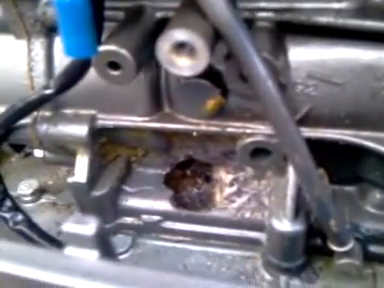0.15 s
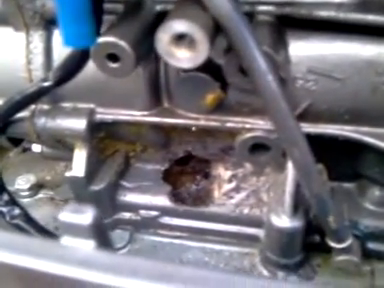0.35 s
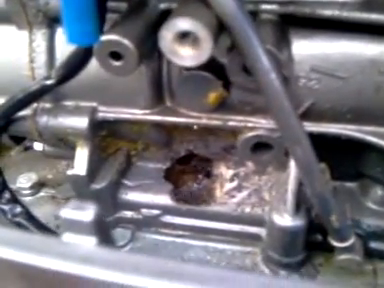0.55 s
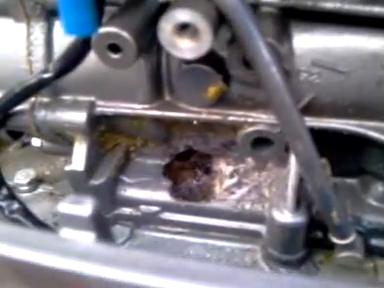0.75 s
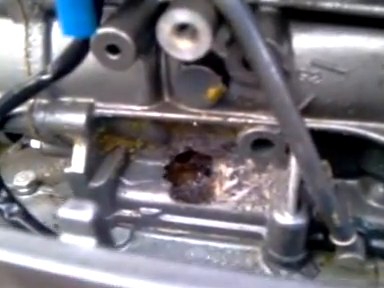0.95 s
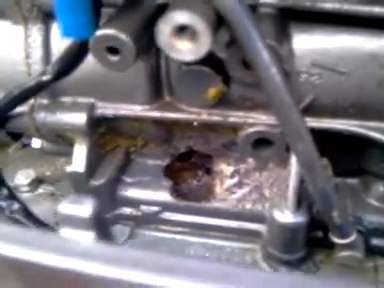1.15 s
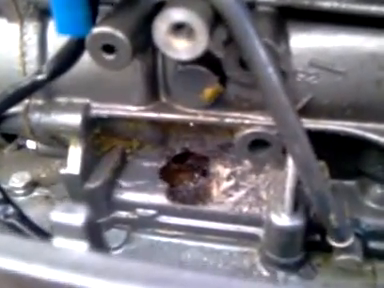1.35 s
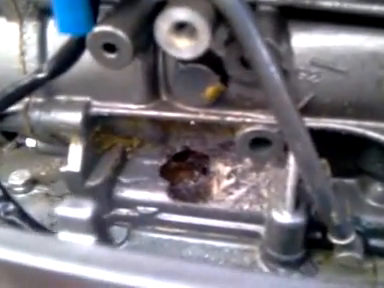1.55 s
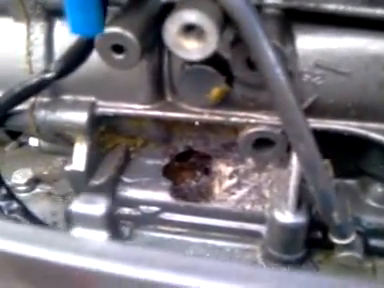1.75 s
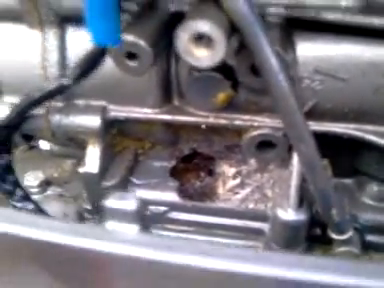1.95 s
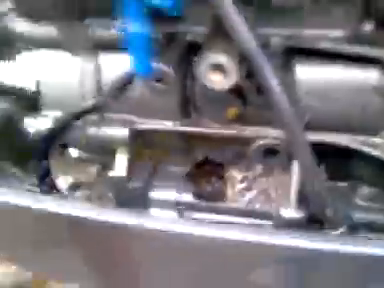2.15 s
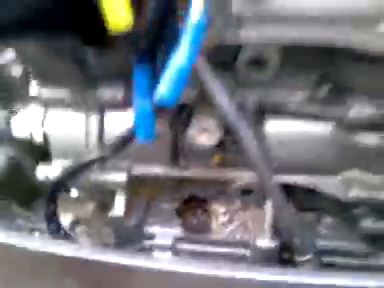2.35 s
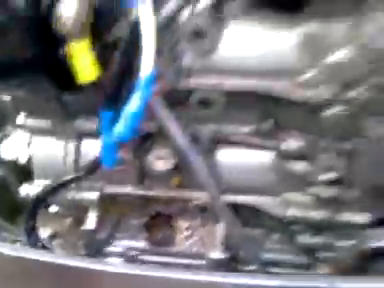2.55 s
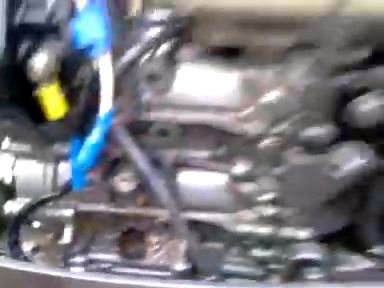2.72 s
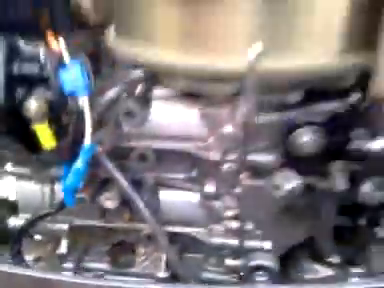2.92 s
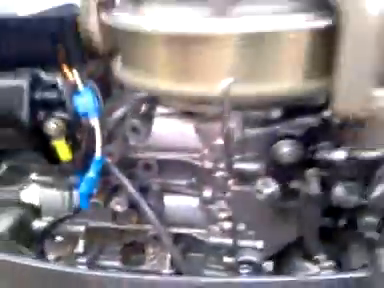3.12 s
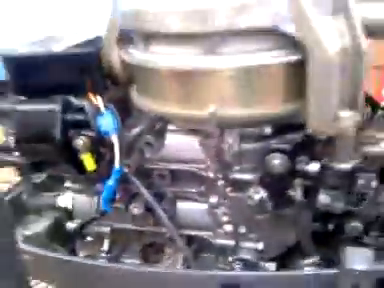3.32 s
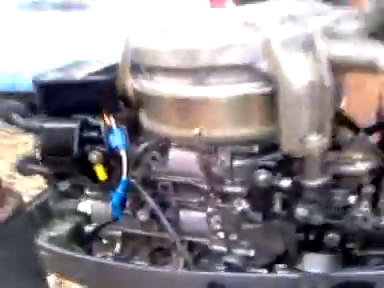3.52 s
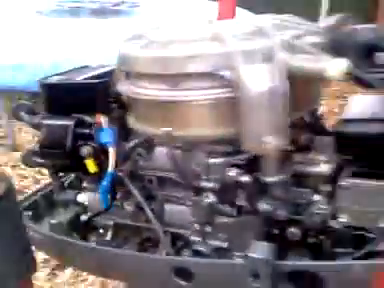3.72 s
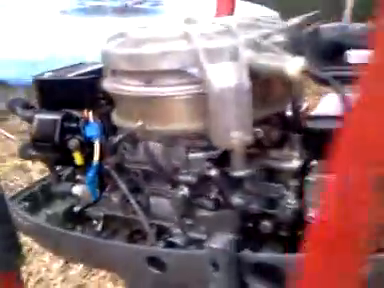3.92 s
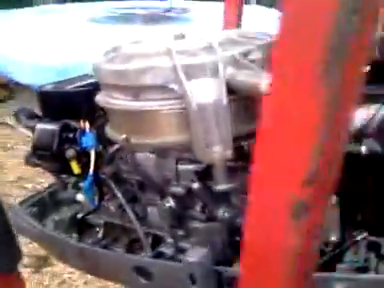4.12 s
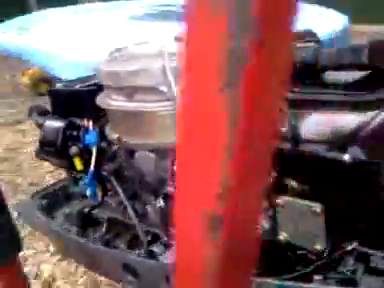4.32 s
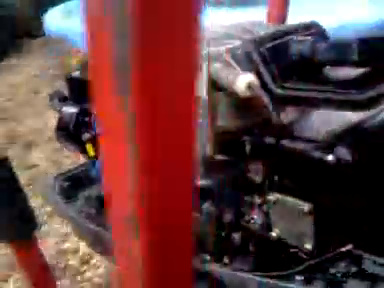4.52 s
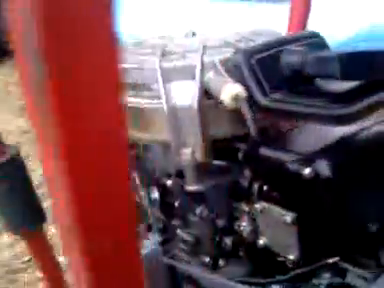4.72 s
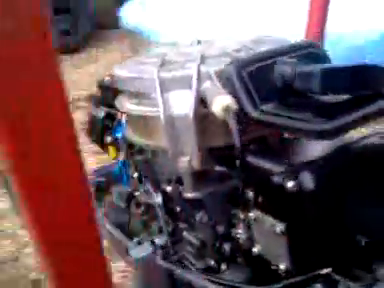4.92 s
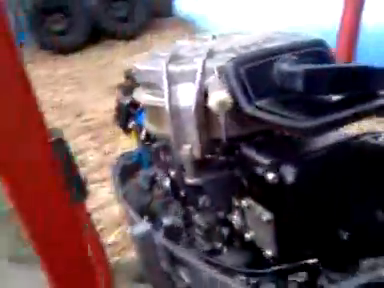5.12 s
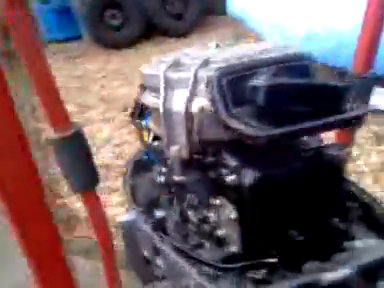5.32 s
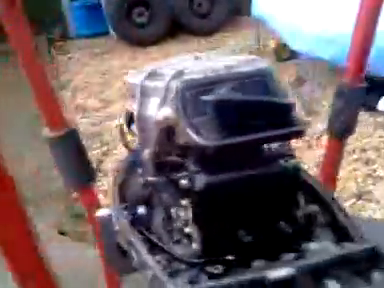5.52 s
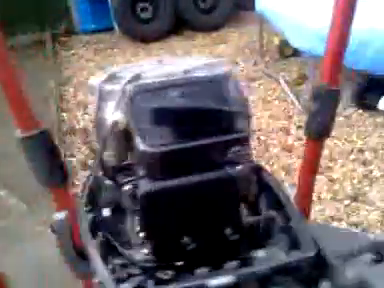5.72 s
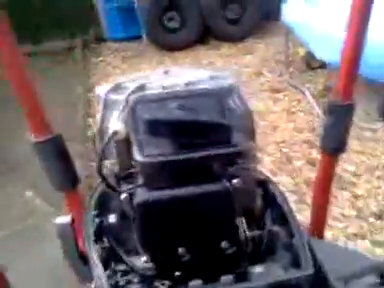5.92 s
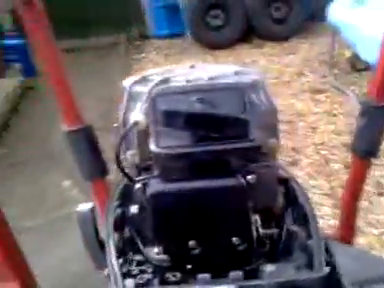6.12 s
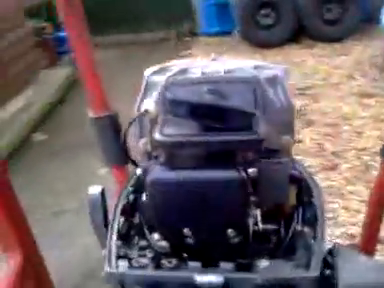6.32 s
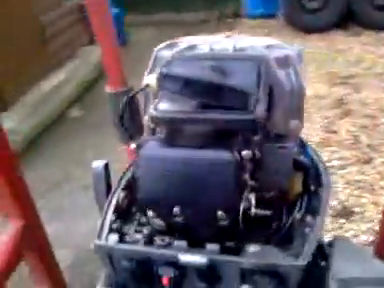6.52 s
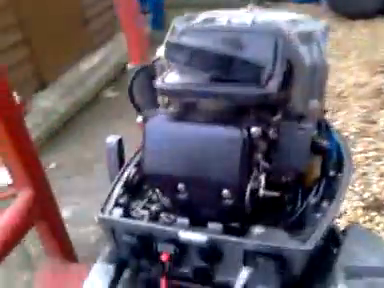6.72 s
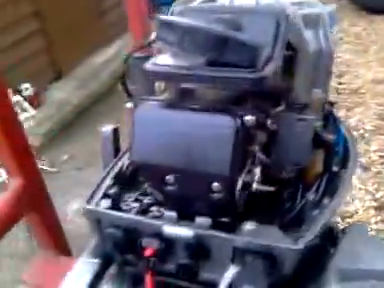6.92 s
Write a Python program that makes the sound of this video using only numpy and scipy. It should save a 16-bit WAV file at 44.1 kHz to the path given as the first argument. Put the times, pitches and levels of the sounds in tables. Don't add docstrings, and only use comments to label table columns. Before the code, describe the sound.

An uncovered two-stroke outboard idles outdoors throughout. Very close at first, its rapid hollow buzzing putter fills the sound, with rattling metal, air hiss and overloaded fizz. After about two seconds the phone backs off; the throaty intake drops and hard metallic knocks stand out unevenly. As it circles to the front, the engine settles somewhat softer, still brisk and clattery. Narrow, gritty phone sound.

```python
import sys
import numpy as np
from scipy import signal
from scipy.fft import rfft, irfft
from scipy.io import wavfile
from scipy.ndimage import uniform_filter1d

SR = 44100
rng = np.random.default_rng(int(sys.argv[2]) if len(sys.argv) > 2 else 0)


def volts_from_db(level):
    exponent = np.asarray(level, float) / 20
    return 10 ** exponent


def master_out(mix):
    frames = np.transpose(np.atleast_2d(mix))
    ceiling = np.clip(frames, -1, 1)
    pcm = np.round(ceiling * 32767).astype(np.int16)
    wavfile.write(sys.argv[1], SR, pcm)


N = 311327
T = np.arange(N) / SR


def evened(x):
    return x / np.sqrt(np.mean(x ** 2) + 1e-20)


def wander(seconds):
    size = round(seconds * SR)
    once = uniform_filter1d(rng.standard_normal(N), size=size)
    return evened(uniform_filter1d(once, size=size))


def noise(points):
    f, db = np.transpose(points)
    hz = np.fft.rfftfreq(N, 1 / SR)
    gain = volts_from_db(np.interp(np.log(hz + 1), np.log(f + 1), db, left=-90, right=-90))
    return evened(irfft(rfft(rng.standard_normal(N)) * gain, N))


def curve(rows):
    s, *columns = np.transpose(rows)
    return [np.interp(T, s, column) for column in columns]


def ring(hz, db, rise, hold, t60):
    t = np.arange(4000) / SR
    swell = 1 - np.exp(-t / rise)
    decay_db = 60 * np.maximum(t - hold, 0) / t60
    return volts_from_db(db - decay_db) * swell * np.sin(2 * np.pi * hz * t)


def rung(s, sizes, shape):
    kicks = np.bincount((s * SR).astype(int), sizes, N)[:N]
    return signal.oaconvolve(kicks, ring(*shape))[:N]


def each_turn(turns, rows, uneven_db, slip_s):
    out = np.zeros(N)
    count = np.arange(-1, int(turns[-1]) + 1)
    for angle, *shape in rows:
        chance = rng.standard_normal((len(count), 2))
        at = (np.interp(count + angle, turns, T) + slip_s * chance[:, 0]) * SR
        started = count + angle > turns[0] - 1 / 12
        sizes = volts_from_db(uneven_db * chance[:, 1]) * started
        kicks = np.bincount(np.clip(at, 0, N - 1).astype(int), sizes, N)
        out += signal.oaconvolve(kicks, ring(*shape))[:N]
    return out


# (time [s], lead [turns])
CRANK_LEAD = [(0, .029), (.2, -.12), (.92, -.95), (1.1, -1.04), (1.62, -1.05), (2.24, -.855), (2.8, -.779),
              (3.08, -.669), (3.64, -.322), (4, .02), (4.3, .155), (5.1, .175), (5.6, .105), (6.1, -.025),
              (6.3, -.14), (6.86, -.378), (7.06, -.513)]


def crank():
    turns_per_s = 25.6
    return turns_per_s * T + curve(CRANK_LEAD)[0]


# (time [s], distance [m], angle from flank to front [0-1], side box in sight [0-1])
PHONE_WALK = [(0, 0.3, 0.07, 0.05), (1.1, .29, 0, 0), (2.05, .31, 0.01, 0), (2.9, 0.49, 0.36, 0.42),
              (3.4, 0.6, .42, 0.7), (3.8, 0.79, 0.3, .9), (4.4, 0.7, 0.7, .36), (5.2, 0.75, 0.6, 0.42),
              (5.8, 0.78, 1, 0.67), (6.7, 0.71, 0.96, 0.78), (7.06, 0.66, 0.94, 0.7)]


def phone_place():
    near_m = .3
    metres, front, sight = curve(PHONE_WALK)
    return 20 * np.log10(np.maximum(metres, .05) / near_m), front, sight


def heard(close_db, fall, front_db, far_db, front):
    return close_db - fall * far_db + front_db * front


# (crank angle [turns], frequency [Hz], level [dB], rise [s], hold [s], t60 [s])
FIRST_REEDS = [
    (.96, 594.5, 1.5, 0.0034, 0.01, 0.035),
    (0.992, 545.5, -6, 0.0012, 0.0012, 0.034),
]
# (crank angle [turns], frequency [Hz], level [dB], rise [s], hold [s], t60 [s])
SECOND_REEDS = [
    (0.468, 560.7, 3, 0.0019, 0.0041, 0.017),
    (0.489, 491, -2, 0.00088, 0.0026, 0.029),
    (0.696, 643, -17, 0.001, 0.0044, 0.042),
]
# (crank angle [turns], frequency [Hz], level [dB], rise [s], hold [s], t60 [s])
SIDE_BOX_RINGS = [
    (0.82, 688, -0.5, 0.006, 0.0053, 0.13),
    (.48, 715, -1, 0.0051, 0.0057, 0.062),
    (.08, 660, -8.5, 0.0062, 0.0072, 0.03),
]


def intake(turns, far_db, front, sight):
    flutter_db = 0.14 * far_db * wander(0.016)
    level_db = heard(-9.5, 1.426, -0.91, far_db, front) + flutter_db
    second_db = -0.56 - 1.4 * front
    first = each_turn(turns, FIRST_REEDS, uneven_db=.8, slip_s=.00003)
    second = each_turn(turns, SECOND_REEDS, uneven_db=1.2, slip_s=.00003)
    box = each_turn(turns, SIDE_BOX_RINGS, uneven_db=3, slip_s=.0008)
    return volts_from_db(level_db + 5.5) * (first + volts_from_db(second_db) * second + sight * box)


# (multiple of crank speed [1], level [dB])
SHAFT_LINES = [(2, -21.5), (4, -20), (8, -5), (10, -14)]
# (crank angle [turns], frequency [Hz], level [dB], rise [s], hold [s], t60 [s])
CASE_THUMPS = [
    (0.4224, 353, 7.5, 0.0012, 0.0023, 0.046),
    (.68, 335, 5, 0.0023, 0.0023, 0.054),
    (0.097, 330, -5.5, 0.0024, 0.0072, 0.12),
    (0.13, 138.7, -9.5, 0.0025, 0.0024, 0.12),
    (0.649, 101, -12, 0.002, 0.0026, 0.054),
]
# (frequency [Hz], density [dB per Hz])
LOW_RUMBLE = [(18, -48.5), (30, -12.5), (155, -1), (203, 8), (259, -10.5), (355, -8.5), (393, -12),
              (440, -3), (570, -38), (970, -120)]


def thrum(turns, far_db, front):
    level_db = heard(-24.5, 0.81, 3.4, far_db, front)
    case_db = 5.26 - 11.5 * front
    lines = sum(volts_from_db(db) * np.cos(2 * np.pi * multiple * turns) for multiple, db in SHAFT_LINES)
    thumps = each_turn(turns, CASE_THUMPS, uneven_db=0.77, slip_s=.00008)
    rumble = volts_from_db(-14) * noise(LOW_RUMBLE)
    return volts_from_db(level_db) * evened(lines + volts_from_db(case_db) * thumps + rumble)


# (crank angle [turns], frequency [Hz], level [dB], rise [s], hold [s], t60 [s])
BLOCK_RINGS = [
    (.62, 1360, -5, 0.0064, 0.004, 0.047),
    (.61, 1000, -12.5, 0.0013, 0.0015, 0.032),
    (0.121, 1000, -10.5, 0.0014, 0.00066, 0.047),
    (0.1322, 1350, -20, 0.0011, 0.00065, 0.026),
    (0.1, 1720, -17, 0.0046, 0.00068, 0.063),
    (0.664, 1730, -21, 0.0046, 0.00052, 0.056),
]
# (frequency [Hz], density [dB per Hz])
LOOSE_PARTS = [(250, -52), (420, -9), (600, -9), (775, -17), (835, -26.5), (881, -14), (994, -3.5),
               (1160, -7.5), (1360, -4.5), (1460, -6), (1950, -17.5), (2100, -28.5), (2730, -53),
               (4620, -120)]


def block(turns, far_db, front):
    level_db = heard(-10, 0.96, 1.1, far_db, front)
    rings = each_turn(turns, BLOCK_RINGS, uneven_db=1.8, slip_s=.00004)
    since_firing = (2 * turns - .24) % 1
    shake = .55 + .8 * np.exp(-since_firing / .4)
    return volts_from_db(level_db) * (volts_from_db(10.5) * rings + volts_from_db(-5.5) * shake * noise(LOOSE_PARTS))


# (frequency [Hz], density [dB per Hz])
AIR_HISS = [(1120, -27.5), (1900, -1), (2170, -7), (2510, -0.5), (2860, -5.5), (3610, -5), (4690, -33.5),
            (7940, -120)]


def hiss(turns, far_db, front):
    level_db = heard(-22, 0.86, -1.6, far_db, front)
    puff = 1 + 0.038 * np.cos(4 * np.pi * (turns - .17))
    ticks = volts_from_db(1.87 * evened(uniform_filter1d(rng.standard_normal(N), size=150)))
    return volts_from_db(level_db - 1.55) * evened(puff * ticks * noise(AIR_HISS))


def stray_firings(turns, far_db):
    firing_turn, stray_share, spread_db = .11, .4, 4.5
    s = np.interp(np.arange(0, turns[-1] - 1, .5) + firing_turn, turns, T)
    chance = rng.random(len(s))
    spread = rng.standard_normal((len(s), 2))
    db = -6.5 - 1.24 * np.interp(s, T, far_db) + spread_db * np.clip(spread[:, 0], -2, 1.5)
    edge_db = -10 + spread_db * spread[:, 1]
    return np.array([s, db, edge_db]).T[chance < stray_share]


# (time [s], peak level [dB], brightness [dB])
HARD_FIRINGS = [(2.498, -4, -16), (2.614, 0, -11.5), (2.692, 1.5, -15), (2.751, 2.5, -10.5),
                (2.809, 0.5, -14), (2.866, 0.5, -12), (2.944, -2, -20), (2.981, -0.5, -7.5),
                (3.059, 0, -20), (3.211, -2, -11.5), (3.325, 1, -12.5), (3.384, -0.5, -21.5),
                (3.441, 1.5, -10), (3.497, 0, -16), (3.593, 0, -15), (3.612, 2, -13.5),
                (3.761, -3.5, -11.5), (3.819, -3.5, -10), (3.838, -0.5, -9), (3.895, -2.5, -20.5),
                (3.952, -3.5, -5.5), (4.008, -1.5, -20), (4.065, -3.5, -15), (4.123, 1.5, -13.5),
                (4.142, -0.5, -17.5), (4.238, -2.5, -13.5), (4.296, 2, -18.5), (4.315, -1, -11),
                (4.432, -2, -8), (4.549, -2.5, -7),
                (4.373, -5.5, -16), (4.667, -5.5, -6), (4.803, -8.5, -14.5), (4.881, -7, -11.5),
                     (4.959, -7.5, -16), (5.057, -3, -10), (5.174, -6, -9), (5.292, -3, -9),
                     (5.312, -1.5, -22), (5.488, -2.5, -9.5), (5.608, -8, -11.5), (5.689, -7, -15.5),
                     (5.726, -8.5, -18), (5.784, -5, -15.5), (5.843, -1, -16.5), (5.863, -3, -17.5),
                     (5.96, -5.5, -17), (6.042, -8.5, -14), (6.081, -5, -19), (6.12, -8.5, -15.5),
                     (6.159, -3.5, -18.5), (6.28, -6.5, -14.5), (6.339, -1, -19), (6.399, -1, -15),
                     (6.441, -8.5, -14.5), (6.519, -3.5, -15), (6.538, -3, -16.5), (6.596, -2.5, -8.5),
                     (6.916, -5.5, -4), (7.037, -2.5, -11)]
# (frequency [Hz], level [dB], t60 [s])
KNOCK_BODY_MODES = [(1003.3, 1, 0.04), (848, -1.5, 0.016), (1102, 0, 0.023), (1308, -5, 0.027),
                    (715, -14.5, 0.033)]
# (frequency [Hz], level [dB], t60 [s])
KNOCK_EDGE_MODES = [(1741, 3.5, 0.029), (1427, 0.5, 0.021), (1920, -17.5, 0.019), (2576, -5.5, 0.0047),
                    (3210, -11, 0.0086)]
# (delay [s], frequency [Hz], level [dB], rise [s], hold [s], t60 [s])
KNOCK_THUDS = [
    (-.003, 190, -25, 0.0085, 0.0036, .05),
    (.033, 120.5, -22.5, 0.0074, 0.0047, 0.044),
]


def knocks(turns, far_db):
    hard = np.array(HARD_FIRINGS) + [0, 1.5, 0]
    s, db, edge_db = np.vstack([hard, stray_firings(turns, far_db)]).T
    out = np.zeros(N)
    for modes, level_db in (KNOCK_BODY_MODES, db - 8.5), (KNOCK_EDGE_MODES, db + edge_db - 4.5):
        for hz, mode_db, t60 in modes:
            sizes = volts_from_db(level_db + 1.5 * rng.standard_normal(len(s)))
            out += rung(s, sizes, (hz, mode_db, .0005, .0012, t60))
    for delay, *shape in KNOCK_THUDS:
        out += rung(s + delay, volts_from_db(db), shape)
    return out


def scene():
    turns = crank()
    far_db, front, sight = phone_place()
    engine = intake(turns, far_db, front, sight) + thrum(turns, far_db, front) + block(turns, far_db, front)
    return (engine + hiss(turns, far_db, front) + knocks(turns, far_db))[None]


# (frequency [Hz], level [dB])
REDRAW_FILTER = [(3500, 1.5), (3850, -1.5), (3990, -3.5)]


def slow_converter(dry):
    up, down = 441, 80
    knee, sharpness = 0.67, 8.6
    slow = signal.resample_poly(dry, down, up, axis=1)
    slow = slow / (1 + abs(slow / knee) ** sharpness) ** (1 / sharpness)
    blocks = N // up + 1
    f, db = np.transpose(REDRAW_FILTER)
    gain = volts_from_db(np.interp(np.fft.rfftfreq(blocks * down, up / down / SR), f, db))
    return irfft(rfft(slow, blocks * down) * gain, blocks * up)[:, :N] * up / down


def treble(x):
    return signal.sosfiltfilt(signal.butter(8, 4100, "high", fs=SR, output="sos"), x)


# (frequency [Hz], level [dB])
TIP_ECHOES = [(4000, -12), (8000, -9), (12000, -22)]


def tip_fizz(fast, flat):
    grid = sum(volts_from_db(db - 2.5) * np.cos(2 * np.pi * hz * T) for hz, db in TIP_ECHOES)
    return treble((fast - flat) * grid + flat)


def blur(fizz, overload):
    smear_s, busy_s, busy_share = .03, .25, .055
    shaved = uniform_filter1d(1. * overload, size=round(busy_s * SR))
    busy = np.clip(2 * shaved / busy_share - 1, 0, 1)
    patches = uniform_filter1d(1. * (wander(busy_s / 4) > -.15), size=400)
    share = .88 * busy * patches
    size = round(smear_s * SR)
    spread = rng.standard_normal(size) * np.hanning(size)
    spread = np.convolve(spread, signal.firwin(101, 12800, fs=SR), "same")
    smeared = signal.oaconvolve(fizz * share, spread[None] / np.linalg.norm(spread), "same")
    return smeared + fizz * np.sqrt(np.abs(1 - share ** 2))


def mirror_leak(fast):
    band = signal.butter(4, [4080, 4450], "band", fs=SR, output="sos")
    mirror = signal.sosfilt(band, fast * np.cos(2 * np.pi * 8000 * T))
    return volts_from_db(-34.5 + 6 * wander(.04)) * mirror


def band_limit(x):
    return signal.sosfilt(signal.butter(12, 15870, fs=SR, output="sos"), x)


def record(dry):
    full_scale = .7
    fast = slow_converter(dry)
    flat = np.clip(fast, -full_scale, full_scale)
    fizz = blur(tip_fizz(fast, flat), fast != flat)
    return band_limit(flat - treble(flat) + fizz + mirror_leak(fast))


dry = scene()
out = record(dry)
master_out(out)
```